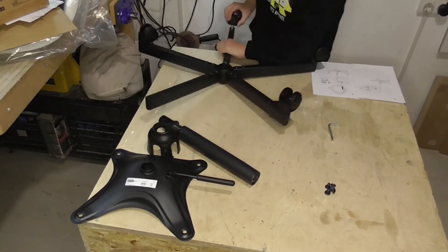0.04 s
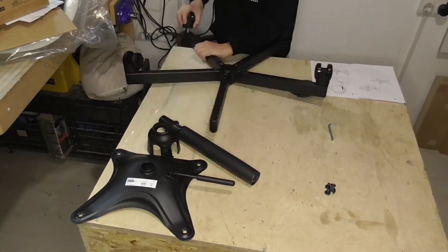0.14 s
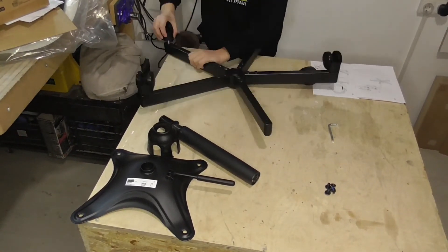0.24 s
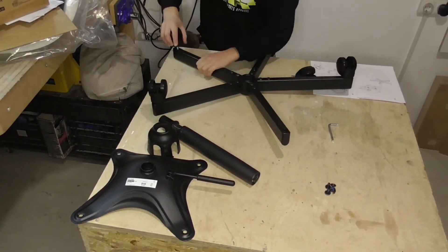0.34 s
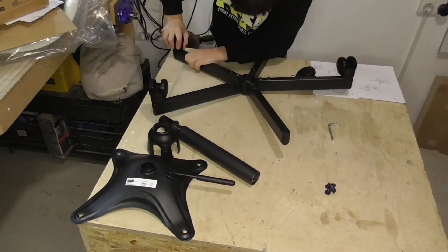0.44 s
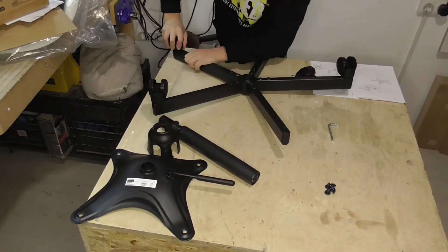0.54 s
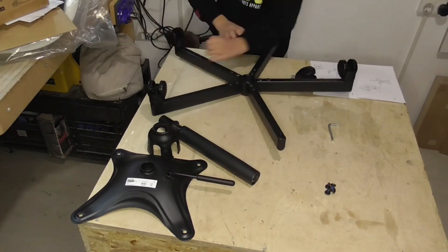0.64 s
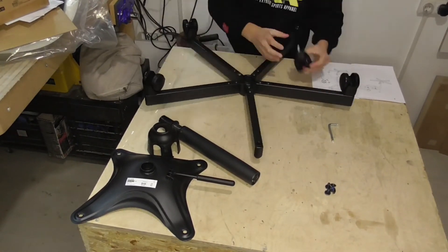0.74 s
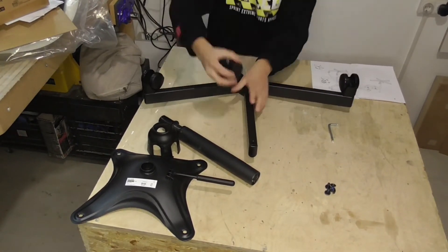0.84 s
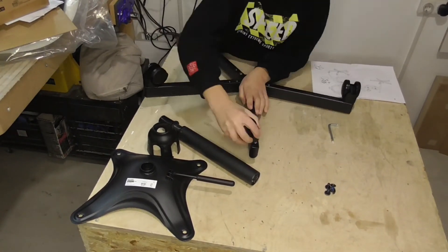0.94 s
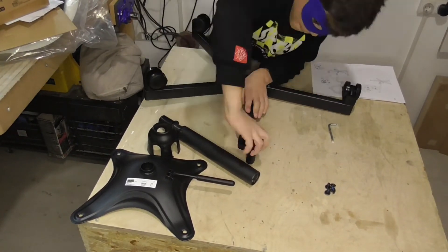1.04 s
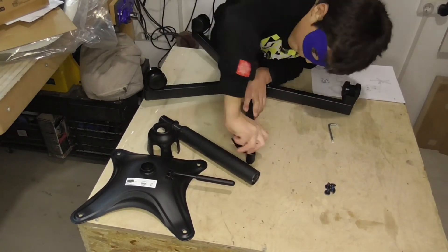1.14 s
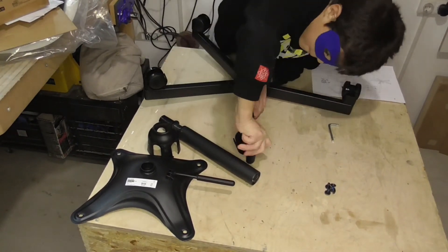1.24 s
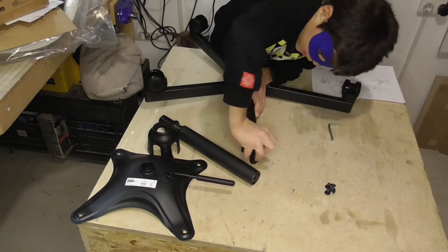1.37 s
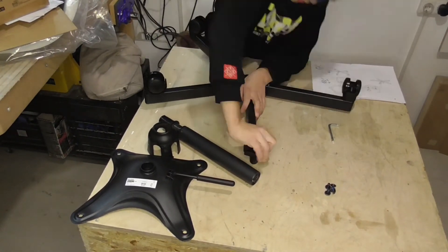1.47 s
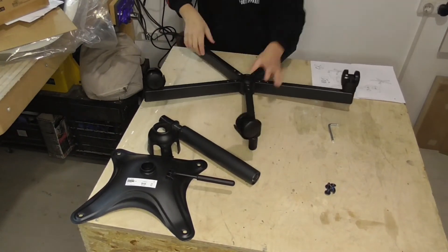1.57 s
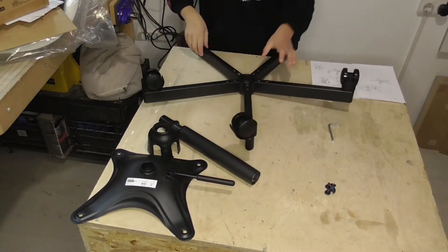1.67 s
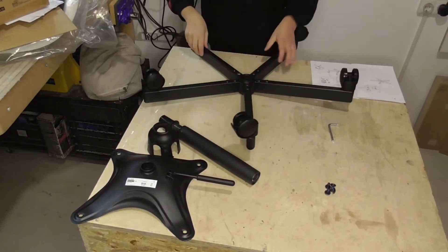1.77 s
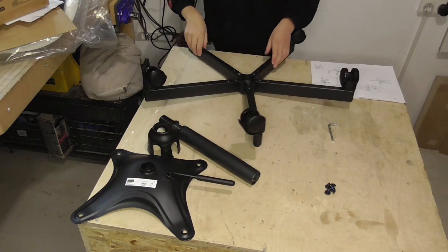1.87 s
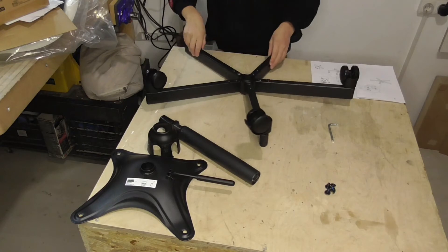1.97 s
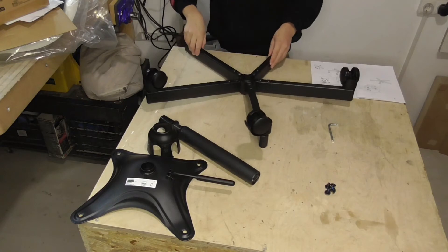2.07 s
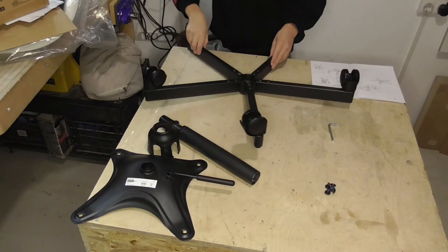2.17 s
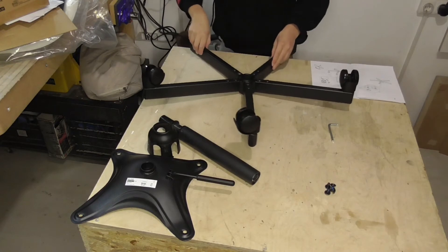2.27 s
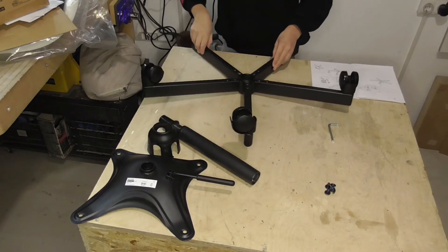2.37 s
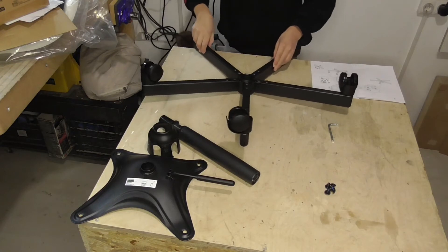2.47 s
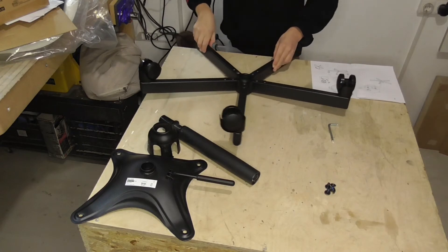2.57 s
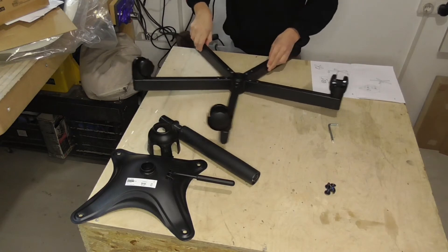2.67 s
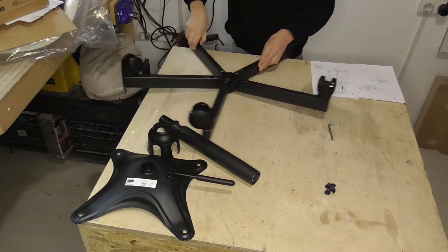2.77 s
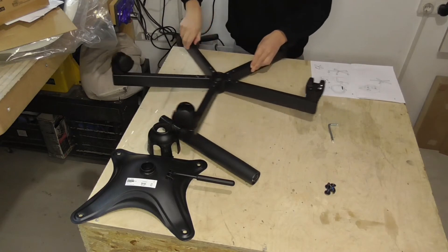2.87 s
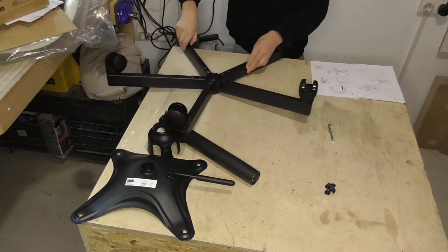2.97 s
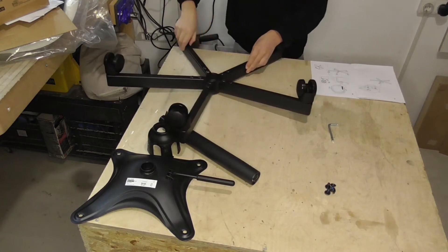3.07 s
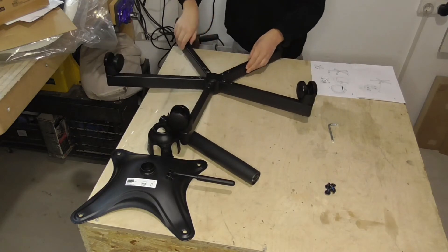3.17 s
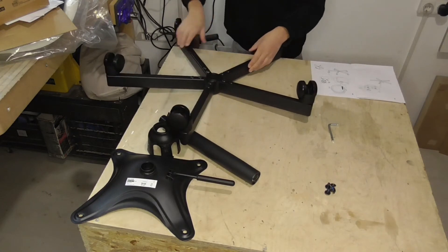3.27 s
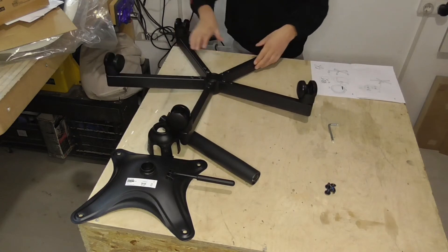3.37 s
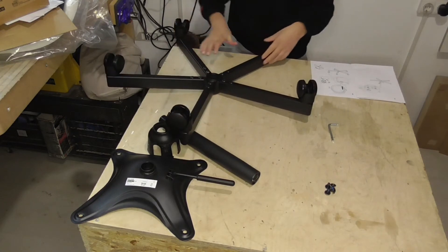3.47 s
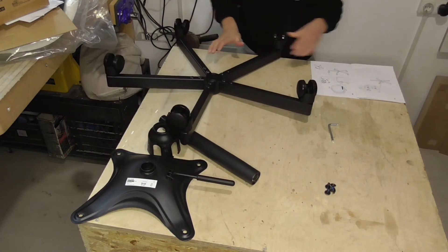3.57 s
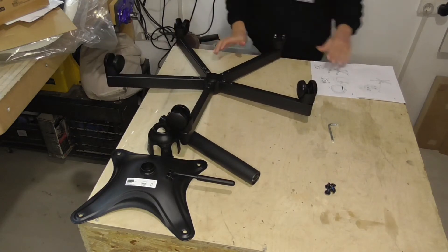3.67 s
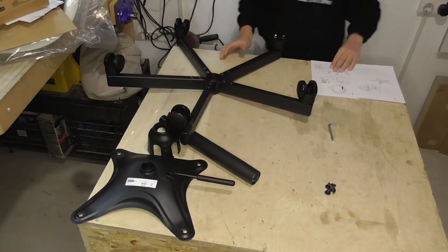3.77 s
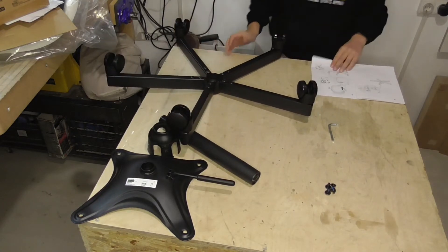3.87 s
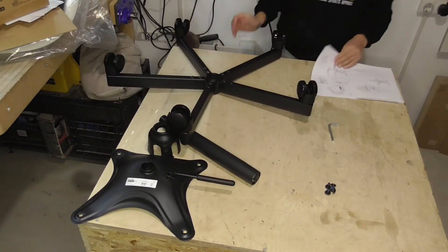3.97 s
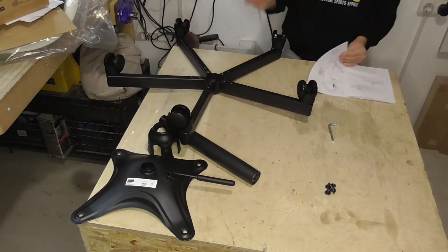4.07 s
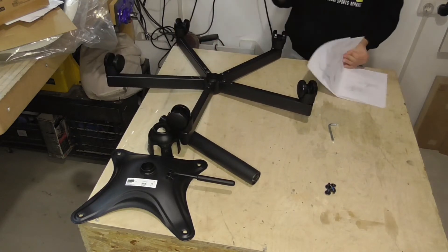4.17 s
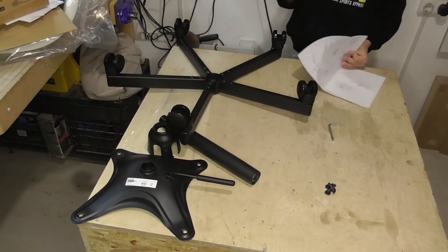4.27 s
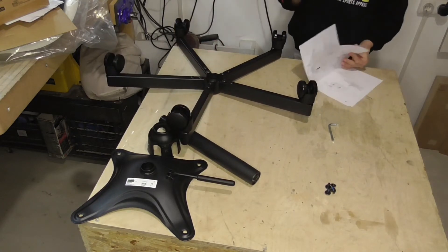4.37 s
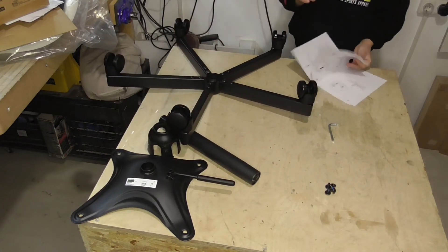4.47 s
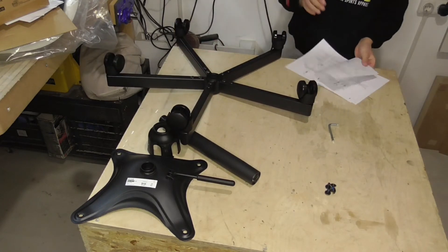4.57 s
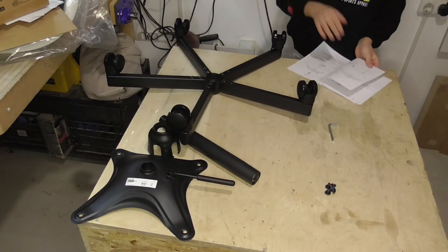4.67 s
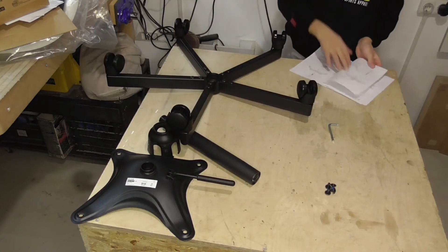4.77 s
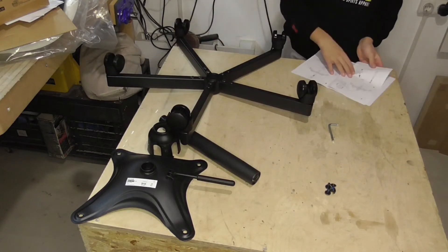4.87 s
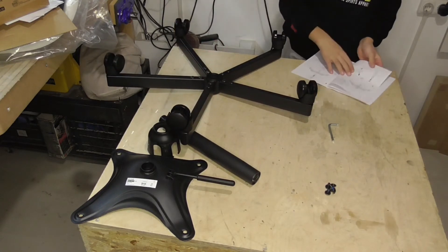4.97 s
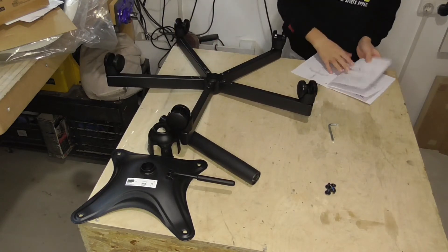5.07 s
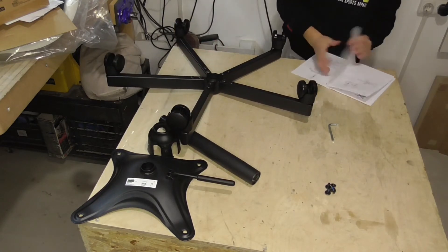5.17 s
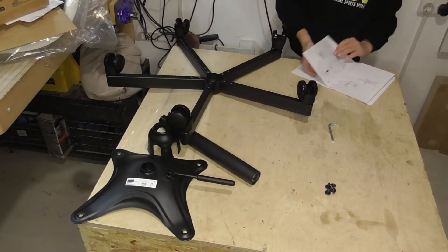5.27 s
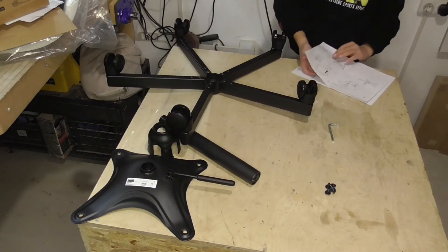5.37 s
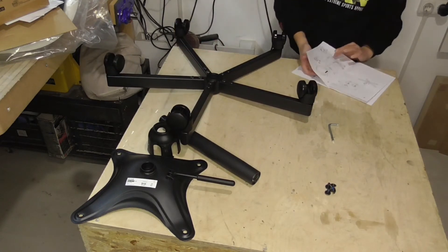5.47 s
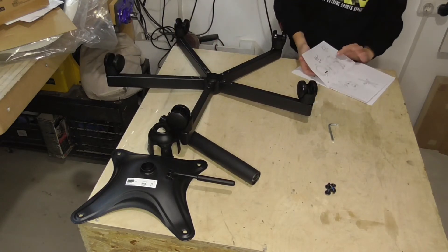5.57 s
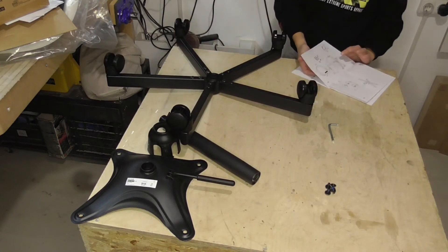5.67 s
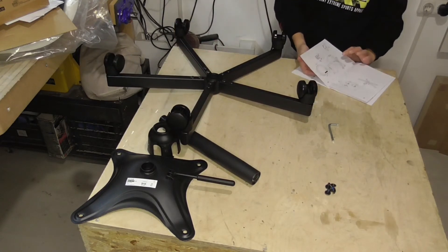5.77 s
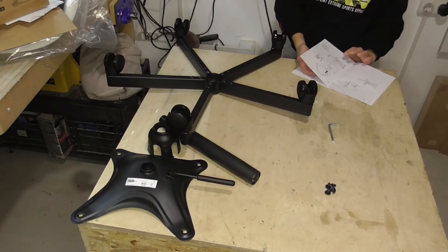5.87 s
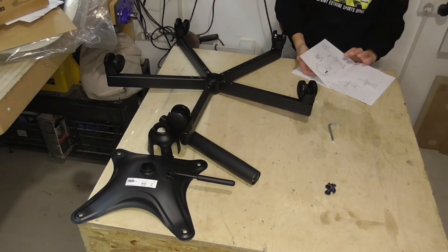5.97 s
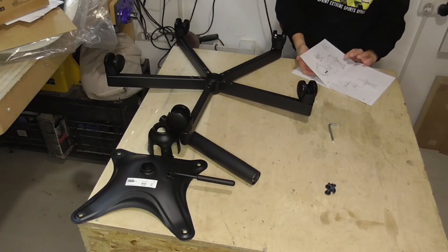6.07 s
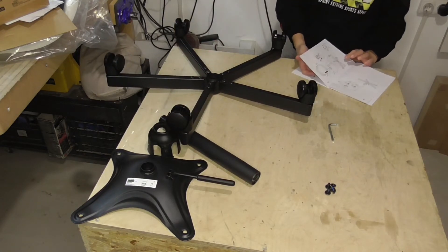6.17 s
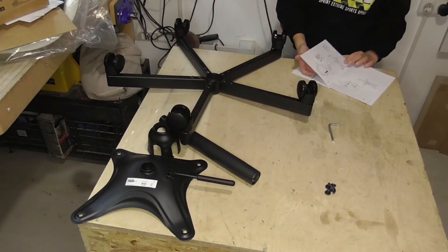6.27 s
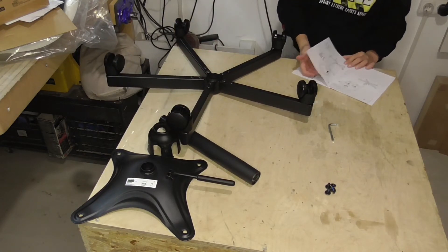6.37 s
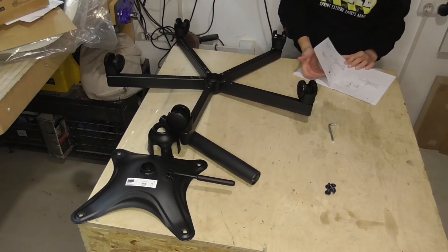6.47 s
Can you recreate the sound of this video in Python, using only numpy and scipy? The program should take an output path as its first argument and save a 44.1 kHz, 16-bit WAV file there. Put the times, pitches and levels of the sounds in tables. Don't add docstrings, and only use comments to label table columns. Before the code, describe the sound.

Chair assembly heard close, in stereo, in a small quiet room: clipped, jumpy clicks and dull knocks of plastic and steel at first, then full hollow thumps as the metal base meets the wooden bench. A swelling stick-slip scrape ends in more thuds and a hand knock. Afterwards paper is picked up and leafed, rustling brightly with crinkles and one hard snap, then long near-quiet with small rustles over faint room hum.

```python
import sys
import numpy as np
from scipy import signal
from scipy.fft import rfft, irfft, next_fast_len
from scipy.io import wavfile
from scipy.ndimage import uniform_filter1d

SR = 44100
rng = np.random.default_rng(int(sys.argv[2]) if len(sys.argv) > 2 else 0)


def put_to_file(sound):
    columns = np.atleast_2d(sound).T
    safe = np.clip(columns, -1, 1)
    whole_steps = np.round(safe * 32767)
    wavfile.write(sys.argv[1], SR, whole_steps.astype(np.int16))


def invert_db(x):
    u = np.asarray(x, float) / 20
    return 10 ** u


N = 288414
SLICE_S, FIRST_SPLICE_S, FAST_UNTIL_S = 0.0421, 0.06, 1.69


def evened(x):
    return x / np.sqrt(np.mean(x ** 2) + 1e-20)


def peaked(x, db):
    return invert_db(db) * x / abs(x.mean(0)).max()


def read(points, hz):
    f, value = np.transpose(points)
    return np.interp(np.log(hz + 1), np.log(f + 1), value)


def colour(x, db_of):
    count = x.shape[-1]
    return irfft(rfft(x) * invert_db(db_of(np.fft.rfftfreq(count, 1 / SR))), count)


def band(hz, lo_hz, hi_hz):
    return -10 * np.log10((1 + (lo_hz / (hz + 1)) ** 6) * (1 + (hz / hi_hz) ** 6))


def looseness(t):
    return 1.0 * (t < FAST_UNTIL_S)


# f/Hz, likeness [0..1]
PORT_LIKENESS = [(100, 0.78), (400, 0.96), (620, 0.77), (1000, 0.8), (1500, 0.7), (4000, 0.65),
                 (7500, 0.065), (11000, 0.47)]


def pair(count, loose=0.):
    a, b = rfft(rng.standard_normal((2, count)))
    same = np.clip(read(PORT_LIKENESS, np.fft.rfftfreq(count, 1 / SR)), 0, 1)
    left, right = irfft([a, same * a + np.sqrt(1 - same ** 2) * b], count)
    return np.array([left, np.sqrt(1 - loose ** 2) * right + loose * rng.standard_normal(count)])


def ring(drive, modes, favoured_hz=1000, focus_db=0., spread=0.022):
    hz, db, t60 = np.transpose(modes)[:, :, None]
    t = np.arange(6144) / SR
    detune = rng.uniform(-1.03, 1, (len(modes), 1))
    db = db - focus_db * np.minimum(abs(np.log2(hz / favoured_hz)), 1.5)
    sign = (-1.) ** np.arange(len(modes))[:, None]
    body = sign * invert_db(db - 60 * t / t60) * np.sin(2 * np.pi * hz * (1 + spread * detune) * t)
    return signal.oaconvolve(drive, body.sum(0)[None], axes=1)[:, :drive.shape[1]]


def resonate(x, hz, width_hz):
    turn = np.exp(2j * np.pi * np.cumsum(hz) / SR)
    r = np.exp(-np.pi * width_hz / SR)
    return evened((turn * signal.lfilter([1 - r], [1, -r], x / turn)).real)


def swing(hz, t60, rise_s):
    t = np.arange(10240) / SR
    tone = np.sin(2 * np.pi * hz * t) * invert_db(-60 * t / t60) * np.minimum(t / rise_s, 1)
    return np.array([tone, tone])


def blow(s, t60, tick_db, rise_s):
    t = np.arange(10240) / SR
    drive = pair(len(t), looseness(s)) * invert_db(-60 * t / t60) * np.minimum(t / rise_s, 1)
    drive[:, 8:10] += invert_db(tick_db - 6.3 * looseness(s)) * np.array([1, -.5])
    return drive


def grains(per_s, spread_db):
    size = invert_db(spread_db * np.minimum(rng.exponential(1, N), 3.5))
    return size * (rng.random(N) < per_s / SR)


def add(mix, s, sound, pan_db=0.):
    t = s + np.arange(sound.shape[1]) / SR
    fast = s < FAST_UNTIL_S
    splice = FIRST_SPLICE_S + SLICE_S * np.ceil((s - FIRST_SPLICE_S) / SLICE_S + .3)
    end = splice if fast else t[-1] - .004
    kept = np.clip((end + 0.0042 - t) / 0.0061, 0, 1)
    if fast:
        kept *= np.clip((t - splice + SLICE_S + 0.0073) / 0.006, 0, 1)
    part = mix[:, round(s * SR):][:, :len(t)]
    part += (sound * kept * invert_db([[pan_db / 2], [-pan_db / 2]]))[:, :part.shape[1]]


# f/Hz, level/dB per Hz
ROOM_TONE = [(20, -21), (50, -4), (90, -7), (145, -7), (206, -0.5), (300, -12), (384, -5.5), (500, -13.5),
             (800, -16), (1200, -21), (2000, -28.5), (6000, -34.5), (11500, -29), (16000, -35)]


def room():
    count = next_fast_len(N)
    bass = colour(pair(count), lambda f: read(ROOM_TONE, f) + band(f, 0.87, 266))
    rest = colour(rng.standard_normal((2, count)), lambda f: read(ROOM_TONE, f) + band(f, 234, 20000))
    return invert_db(-58) * evened(bass + rest)[:, :N]


# t/s, length/s, level/dB, dullness [steps]
RUBS = [(0.042, 0.18, -69.5, 5), (0.294, 0.088, -73, 9.5), (0.643, 0.14, -74.5, 6),
        (0.766, 0.031, -65.5, 2.5), (.82, 0.28, -74.5, 5), (1.03, 0.15, -69.5, 5.5),
        (1.232, 0.068, -79, 7.5), (1.483, 0.11, -72, 6), (1.6, 0.05, -63.5, 0), (1.738, 0.079, -67.5, 0),
        (3.022, 0.083, -58.5, 2.5), (3.29, 0.16, -68.5, 2), (3.468, 0.15, -62.5, 0),
        (3.637, 0.073, -60, -1.5), (3.777, 0.11, -65, 1.5), (3.91, 0.092, -62, 3),
        (3.982, 0.048, -53.5, -3.5), (4.053, 0.028, -46, -0.5), (4.103, 0.18, -47.5, -0.5),
        (4.279, 0.13, -54, 2.5), (4.464, 0.18, -56, 1.5), (4.646, .17, -60, 1), (4.95, 0.093, -70, 4.5),
        (5.06, 0.15, -64, 2), (5.264, 0.19, -64, 3), (5.413, 0.14, -70.5, 6), (6.136, 0.16, -75, 0.5),
        (6.289, 0.079, -64, 6.5), (6.385, .16, -59.5, 2)]
# t/s, length/s, level/dB
SLIPS = [
    (4.165, 0.057, -54),
    (4.294, 0.072, -58),
    (4.483, 0.089, -55),
    (4.597, 0.11, -61),
]
# level/dB at dullness 0, slope/dB per step of dullness
REGISTERS = [(-3, 2.5), (-1.14, 0.68), (-2.5, -1), (-5, -0.3)]


def rubs():
    t, out = np.arange(N) / SR, np.zeros((4, N))
    rise_s, fade_db_per_s = 0.014, 277
    base_db, lean_db = np.transpose(REGISTERS)[:, :, None]
    top_only = np.array([[-60], [-60], [-12], [0]])
    strokes = [(s, length, db + base_db + lean_db * dull) for s, length, db, dull in RUBS]
    strokes += [(s, length, db + top_only) for s, length, db in SLIPS]
    for s, length, db in strokes:
        u = t[:SR // 2 + round(length * SR)]
        shape = np.minimum(u / rise_s, 1) * invert_db(-fade_db_per_s * np.maximum(u - length, 0))
        part = out[:, round(s * SR):][:, :len(u)]
        part += (invert_db(db) * shape)[:, :part.shape[1]] ** 2
    return np.sqrt(out)


# f/Hz, level/dB per Hz
RUSTLE_COLOUR = [(100, -38), (230, 4.5), (500, 3.5), (1200, -8), (2500, -16.5), (3800, -11.5), (5500, -16),
                 (7500, -13.5), (9000, -13), (11000, -10), (13000, -14.5), (15500, -25.5)]


def rustle():
    count = next_fast_len(N)
    clumps = invert_db(1.1 * evened(uniform_filter1d(rng.standard_normal(N), 900)))
    crackle = clumps * (1 + 4.2 * uniform_filter1d(grains(300, 5.3), 10))
    drive = pair(count, looseness(np.arange(count) / SR)) * np.resize(crackle, count)
    layers = []
    for edges in [(130, 1200), (1200, 5000), (5000, 9000), (9000, 17000)]:
        register = colour(drive, lambda f: read(RUSTLE_COLOUR, f) + band(f, *edges))
        layers.append(evened(register)[:, :N])
    folds = invert_db(1.83 * evened(uniform_filter1d(rng.standard_normal((4, N)), 1500)))
    return np.einsum("kcn,kn->cn", layers, rubs() * folds)


# f/Hz, level/dB per Hz
AIR = [(2650, -7.5), (4500, -9), (6060, -22.5), (8460, -9), (9310, -12.5), (10700, -5), (15300, -36),
       (16000, -63)]


def snap(drive, db, hz, top_db, air_from_hz):
    drive = np.roll(drive, 44, axis=1)
    top_hz = max(5800, 2.1 * hz)
    sheet = colour(drive, lambda f: band(f, 230, top_hz) - 8.4 * abs(np.log2((f + 1) / hz)))
    puff = colour(drive, lambda f: read(AIR, f) + band(f, air_from_hz, 20000))
    return peaked(sheet, db - 5.5) + peaked(puff, db + top_db - 6.5)


# t/s, peak level/dB, centre f/Hz, top level/dB re peak, t60/s
FLAPS = [(3.786, -42, 1060, -14, 0.39), (4.063, -43, 1140, -11, 0.094), (4.276, -30, 1060, -22, 0.36),
         (4.328, -28, 1070, -19, 0.13), (4.443, -29.5, 1030, -19, 0.3), (4.824, -30, 1250, -14, 0.3),
         (4.852, -18.5, 3530, 0.5, 0.2), (4.853, -25, 1000, -25, .35), (4.99, -40, 1200, -37, 0.12),
         (5.152, -43, 1360, -40, .08), (5.187, -32.5, 1140, -42, 0.24), (5.34, -37, 1130, -2, 0.32),
         (5.443, -32.5, 1280, -19, 0.2), (5.822, -44.5, 900, -28, 0.15), (6.302, -40, 1080, -17, 0.24),
         (6.338, -28, 2140, -14, 0.18), (6.407, -35.5, 1480, -8, 0.38), (6.435, -29, 1380, -20, 0.26)]


def flaps():
    out = np.zeros((2, N))
    for s, db, hz, top_db, t60 in FLAPS:
        drive = blow(s - .001, t60, -3., .005)
        add(out, s - .001, snap(drive, db, hz, top_db, 0))
    return out


# t/s, peak level/dB, centre f/Hz, top level/dB
POPS = [(3.976, -41, 2570, -47), (3.9945, -27, 4100, -36), (4.0405, -50, 7000, -32),
        (4.2765, -24, 5050, -31), (4.008, -33, 3500, -50), (4.0645, -38, 7000, -40),
        (4.087, -40, 7500, -42), (4.2, -36, 3800, -50), (4.227, -34, 5000, -46), (4.316, -24, 3700, -48),
        (4.331, -32, 3600, -50), (4.37, -38, 4500, -50), (4.4453, -36, 3470, -52), (4.994, -41, 2000, -60),
        (5.189, -42, 2200, -64), (5.349, -42, 3300, -60), (5.445, -37, 2800, -60), (6.411, -40, 1500, -58),
        (6.436, -31, 1400, -56), (4.825, -40.5, 2750, -46), (4.8377, -40, 2580, -49),
        (4.8531, -11, 3800, -28), (6.161, -50, 6500, -75), (6.1794, -44.5, 3880, -77),
        (6.22, -42, 7000, -81), (6.3385, -24, 2960, -48)]


def pops():
    out = np.zeros((2, N))
    for s, db, hz, top_db in POPS:
        drive = blow(s - .001, .011, 9., .0002)
        drive = np.roll(np.roll(drive, 44, axis=1)[:, :2048], -44, axis=1)
        add(out, s - .001, snap(drive, db, hz, top_db - db + 12, hz))
    return out


# t/s, load level/dB, speed level/dB, loaded spot f/Hz, board spot f/Hz
DRAGS = [
    [(.062, -37.5, -46, 423, 950), (.095, -37.5, -47.5, 357, 900), (.108, -38.5, -40, 378, 896),
     (.145, -35.5, -39, 354, 850), (.158, -36.5, -50, 345, 1150), (.185, -37.5, -51, 345, 900),
     (.24, -46, -58, 330, 900)],
    [(1.8, -38, -58, 346, 1000), (1.864, -53, -58, 320, 1020), (1.925, -37, -52, 308, 1020)],
    [(2.07, -35, -62, 292, 1000), (2.094, -49.5, -60.5, 264, 990), (2.16, -40, -50, 259, 1040),
     (2.305, -35, -43.5, 267, 1150)],
    [(2.4, -38, -50, 307, 1050), (2.5, -43, -48, 315, 1004), (2.64, -44, -46.5, 326, 1200),
     (2.672, -38, -41, 350, 1190), (2.685, -32, -33, 330, 1174), (2.76, -35.5, -34, 401, 1154),
     (2.85, -33, -32.5, 554, 1160), (2.92, -34, -34, 495, 1044), (2.98, -31, -36, 380, 1010)],
    [(3.04, -38, -45, 304, 1040), (3.144, -63, -74, 325, 1000)],
]
# slope/dB per dB of speed, offset level/dB
SPEED_LAW = [
    (1.07, 1),
    (1.13, -9.5),
    (0.68, -36),
]


def slides(t):
    out = 0
    for rows in DRAGS:
        s, load_db, speed_db, *_ = np.transpose(rows)
        fade = np.clip(np.minimum(t - s[0], s[-1] - t) / .007 + .5, 0, 1)
        speed = np.interp(t, s, speed_db)
        out = out + fade * invert_db([np.interp(t, s, load_db)] + [k * speed + db for k, db in SPEED_LAW])
    return out


# f/Hz, level/dB, t60/s
BENCH = [(171.6, -4, 0.26), (226, 0.5, 0.14), (248.7, 0.5, 0.14), (280, -6.5, 0.2), (345, 1.5, 0.091),
         (385, -3, 0.15), (450, 1.5, 0.073), (506.4, -4, 0.14), (588, 0, 0.087), (411, 2, 0.015)]
# f/Hz, level/dB, t60/s
BOARD = [(640.5, -10, 0.25), (781, 5, 0.034), (912.5, -10.5, 0.23), (1018, 1, 0.043), (1151, -3, 0.066),
         (1320, -4, 0.038), (1421, -17, 0.27), (1543, -7, 0.019), (850, -6, 0.05), (1750, 0.5, 0.0051)]
# f/Hz, level/dB, t60/s
STEEL = [(1980, 3.5, 0.034), (2150, 3.5, 0.036), (2377, 3, 0.034), (2510, 5.5, 0.02), (3013, 3, 0.024),
         (3190, -7.5, 0.025), (3430, 1.5, 0.024), (3700, 6, 0.021), (3880, -4, 0.13), (3960, -5, 0.079),
         (4620, 3.5, 0.015), (4960, -2.5, 0.017), (4180, -1, 0.031)]


def drags():
    t = np.arange(144000) / SR
    drive = pair(len(t), looseness(t)) * (.5 + grains(1500, 1.5)[:len(t)])
    low = colour(drive, lambda f: band(f, 210, 700))
    upper = colour(drive, lambda f: band(f, 650, 1800))
    bright = colour(drive, lambda f: band(f, 1500, 4300))
    s, spot_hz, board_hz = np.concatenate(DRAGS)[:, [0, 3, 4]].T
    spot = np.interp(t[::64], s, spot_hz)
    weights = invert_db([db - 24.7 * np.minimum(abs(np.log2(hz / spot)), .75) for hz, db, _ in BENCH])
    weights = np.repeat(weights, 64, axis=1)
    bench = sum(w * evened(ring(low, [mode], spread=0.0056)) for w, mode in zip(weights, BENCH))
    bench = bench / np.linalg.norm(weights, axis=0)
    bench = bench + 0.65 * resonate(low, np.interp(t, s, spot_hz), 20.0)
    board = evened(ring(upper, BOARD, 1560, 11.0, spread=0.0057))
    board = board + 0.53 * resonate(upper, np.interp(t, s, board_hz), 62.0)
    grit = colour(bright[:, ::-1], lambda f: -6.5 * np.log2(f / 2000 + 0.083))
    steel = evened(ring(drive, STEEL, 1540, 7.7, spread=0.0046)) + 0.46 * evened(grit)
    hiss = colour(drive, lambda f: read(RUSTLE_COLOUR, f) + band(f, 4500, 12000))
    layers = [bench, evened(board), evened(steel), evened(hiss)]
    return np.pad(np.einsum("kcn,kn->cn", layers, slides(t)), ((0, 0), (0, N - len(t))))


# t/s, peak level/dB, favoured f/Hz, air level/dB re peak, t60/s
CLACKS = [(0.2494, -48.5, 1600, -16, .33), (0.275, -21.5, 3170, -15, 0.22),
          (0.4823, -34.5, 2070, -14, 0.24), (0.9443, -28.5, 1670, -7, 0.4), (0.9859, -31, 1950, -5.5, 0.21),
          (1.196, -56, 1620, 7.5, 0.29), (1.3214, -26.5, 4220, -1, 0.31), (1.4875, -54, 2880, -8, 0.053),
          (1.5374, -37, 3460, -20, 0.31), (1.6147, -48.5, 3960, 4, 0.098), (1.7, -41.5, 1656, -14, 0.4),
          (1.7149, -26, 2150, -7.5, 0.15), (1.934, -43, 1750, -32, 0.41), (1.9519, -28.5, 2160, -5.5, 0.18),
          (2.3132, -35, 2060, -5, 0.29), (2.3316, -23, 4470, -12.5, 0.19), (2.9972, -38.5, 4060, -33, 0.41),
          (3.0224, -33.5, 2460, -16, 0.18), (3.1934, -52.5, 2600, -2, 0.28),
          (3.2286, -34.5, 2030, -24.5, 0.14), (3.2575, -38, 2090, 2.5, 0.11),
          (3.2859, -40.5, 3330, -23, 0.19)]


def clacks():
    out = np.zeros((2, N))
    for s, db, hz, air_db, t60 in CLACKS:
        drive = blow(s, t60, 23.1, 0.0011)
        click = evened(colour(drive, lambda f: band(f, 930, 6200)))
        steel = evened(ring(drive, STEEL, hz, 4.4)) + 0.36 * click
        puff = colour(blow(s, 0.67 * t60, 4.8, 0.0019), lambda f: read(AIR, f))
        add(out, s, peaked(steel, db) + peaked(puff, db + air_db), pan_db=1)
    return out


# t/s, peak level/dB, f/Hz, t60/s
RINGS = [(.274, -33, 3600, 0.045), (.276, -33, 3000, .15), (1.322, -44, 4080, 0.27), (1.328, -41, 4175, .3),
         (1.33, -39.5, 4250, .3), (1.324, -41, 2200, 0.27), (1.322, -41.5, 1930, .3),
         (1.702, -12, 348, .22), (1.701, -24, 1100, 0.11), (1.73, -26.5, 268, 0.29),
         (1.935, -10.5, 250, .16), (1.956, -22.5, 355, 0.15), (2.012, -23.5, 255, 0.18),
         (1.71, -25, 200, 0.19), (.945, -26.5, 600, 0.18), (.062, -36.5, 430, .2), (.146, -38.5, 560, .3),
         (.188, -41.5, 186, .4), (.272, -30, 910, 0.17), (1.9, -33.5, 735, .2), (3.228, -20, 650, .12),
         (3.365, -17, 270, .07), (3.29, -25, 430, .12), (3.372, -29, 560, .15), (1.935, -24, 1130, .08),
         (2.313, -22, 1000, .08), (3.17, -38, 228, 0.17), (5.8, -56.5, 205, 1.4), (1.953, -20, 452, 0.086),
         (2.315, -13, 350, 0.2), (2.333, -43, 3950, 0.26), (3.229, -11, 435, .13), (3.232, -28, 151, 0.34),
         (3.3, -36, 255, .3), (2.22, -37, 340, 0.45)]


def rings():
    out = np.zeros((2, N))
    for s, db, hz, t60 in RINGS:
        add(out, s, peaked(swing(hz, t60, .002), db))
    return out


# t/s, peak level/dB, f/Hz, t60/s
BOOMS = [(0.273, -45.5, 85, 0.25), (0.944, -30, 87, 0.14), (1.195, -40.5, 87.6, 0.26),
         (1.695, -48, 99, 0.73), (1.932, -38.5, 98, 0.49), (2.31, -40.5, 87.5, 0.39),
         (2.992, -46, 96, 0.22), (3.224, -32, 91.6, 0.42), (3.365, -42, 109, 0.27),
         (4.612, -44, 105.5, 0.26), (4.702, -37.5, 105, 0.067)]


def booms():
    out = np.zeros((2, N))
    for s, db, hz, t60 in BOOMS:
        add(out, s, peaked(swing(hz, t60, 0.0075), db), pan_db=-4.5)
    return out


# t/s, peak level/dB, favoured f/Hz, upper modes level/dB re peak, pan/dB left-right
PUSHES = [(0.249, -37, 608, 8, 1), (0.272, -20, 296, -5, -0.5), (0.376, -35, 225, -28, -7),
          (0.44, -49, 285, -9, -9), (0.479, -25.5, 450, -1.5, 0.5), (0.735, -39, 452, -7.5, 2),
          (0.941, -17.5, 344, -6.5, -5.5), (0.987, -32, 390, -1, -2), (1.029, -37.5, 416, -7, 2),
          (1.103, -43, 405, -9, 1), (1.194, -22, 385, -7.5, 2.5), (1.322, -34, 286, -2.5, -3.5),
          (1.365, -30, 384, -12, -3), (1.539, -40, 184, 1, -1)]
# t/s, peak level/dB, favoured f/Hz, upper modes level/dB re peak, t60/s
THUDS = [(1.701, -11.5, 385, -4, 0.2), (1.71, -19, 332, -10, 0.3), (1.79, -32.5, 338, -6, 0.19),
         (1.933, -11, 251, -3, 0.16), (1.953, -14.5, 410, -5.5, 0.29), (2.011, -18.5, 280, -12.5, 0.27),
         (2.311, -11, 350, -5, 0.26), (2.333, -17, 345, -4.5, 0.25), (2.985, -13.5, 345, -12.5, 0.27),
         (3.174, -36, 226, -8, 0.33), (3.2266, -10, 440, -10, 0.21), (3.256, -21, 334, -11.5, 0.55),
         (3.299, -19, 320, -30, 0.084), (3.365, -22, 283, -9, 0.23), (3.807, -42.5, 245, -6, 0.2),
         (3.917, -44.5, 323, -3.5, 0.37), (4.607, -35, 149, -2, 0.22), (5.293, -44.5, 246, -22, 0.95),
         (4.45, -43, 262, -4, 0.57), (5.44, -42, 240, -6, 0.23), (5.79, -55, 205, -23, 1)]


def thuds():
    out = np.zeros((2, N))
    soft = signal.butter(1, [120, 1800], "band", fs=SR, output="sos")
    pushes = [(*row[:4], 0.24, row[4]) for row in PUSHES]
    for s, db, hz, upper_db, t60, pan_db in pushes + [(*row, -0.4) for row in THUDS]:
        drive = signal.sosfilt(soft, blow(s, t60, 29.97, 0.0051))
        fade = invert_db(-25 * np.arange(drive.shape[1]) / SR / t60)
        low = peaked(fade * ring(drive, BENCH, hz, 11.2, 0.023), db)
        upper = peaked(fade * ring(drive, BOARD, spread=0.032), db + upper_db)
        add(out, s, low + upper, pan_db)
    t = np.arange(10240) / SR
    for s, db, *_ in THUDS[:9]:
        weight = np.array([t * np.exp(-t / .009)] * 2)
        add(out, s, peaked(weight, db - 16.5), pan_db=-3.5)
    return out


def scene():
    return room() + rustle() + flaps() + pops() + drags() + clacks() + rings() + booms() + thuds()


def roll_off(x):
    return signal.sosfilt(signal.butter(12, 16420, fs=SR, output="sos"), x)


# f/Hz, lead of the left port/rad
PORT_LEAD = [(300, 0.13), (700, .5), (1500, 0.069), (4050, -0.28), (6720, -.3), (8270, -1.6), (11000, -1),
             (15000, -1.5)]


def record(dry):
    count = next_fast_len(N)
    lag = np.exp(-1j * read(PORT_LEAD, np.fft.rfftfreq(count, 1 / SR)))
    mix = np.array([dry[0], irfft(rfft(dry[1], count) * lag, count)[:N]])
    mix = signal.sosfilt(signal.butter(2, 75, "high", fs=SR, output="sos"), mix)
    mix = signal.sosfilt(signal.cheby2(12, 50, 16100, fs=SR, output="sos"), mix)
    return roll_off(mix)


dry = scene()
out = record(dry)
put_to_file(out)
```